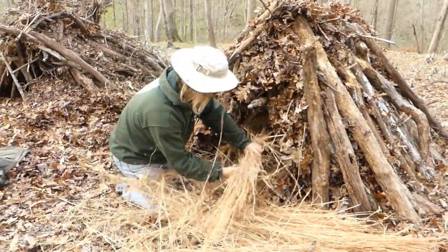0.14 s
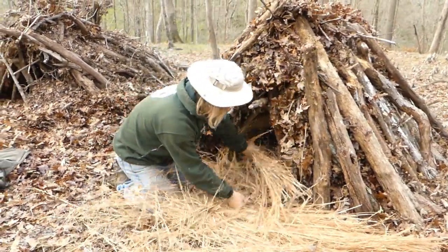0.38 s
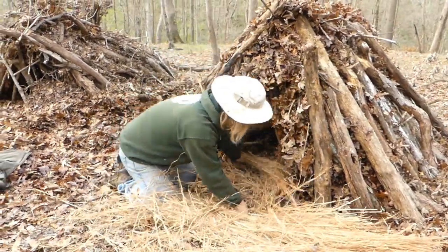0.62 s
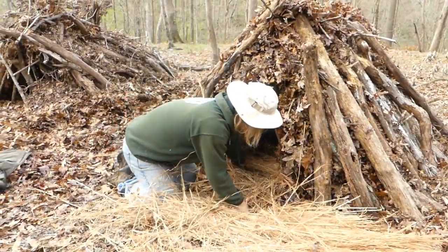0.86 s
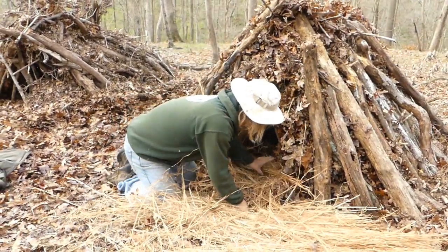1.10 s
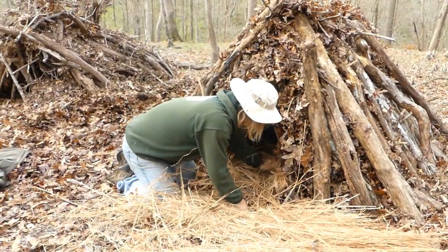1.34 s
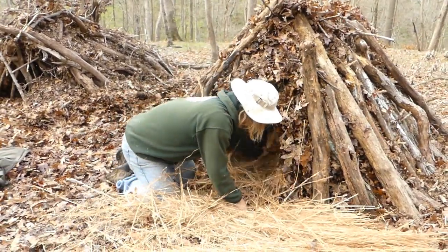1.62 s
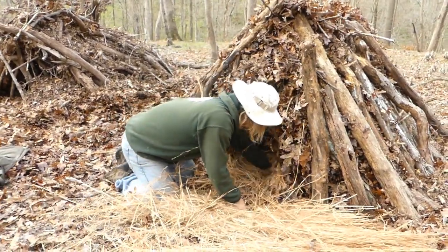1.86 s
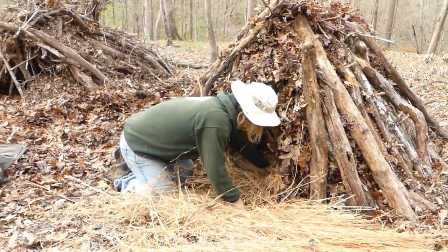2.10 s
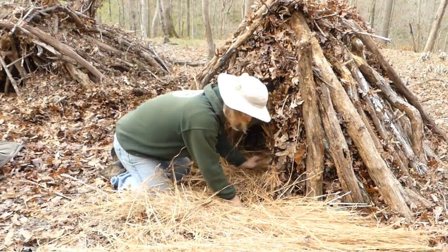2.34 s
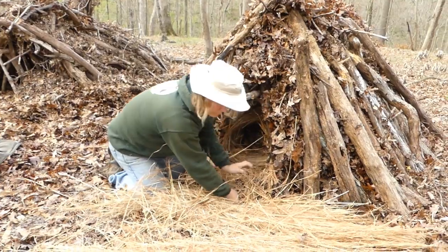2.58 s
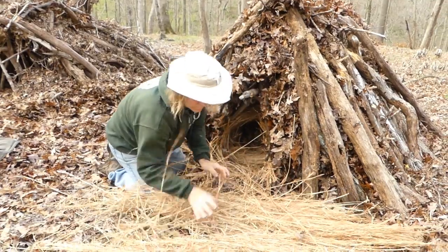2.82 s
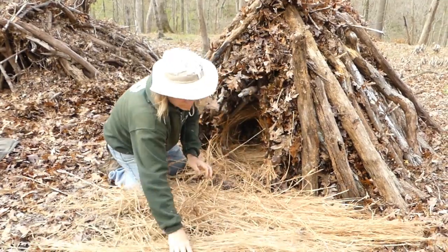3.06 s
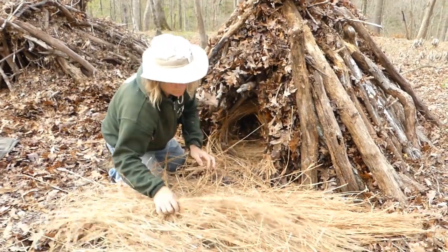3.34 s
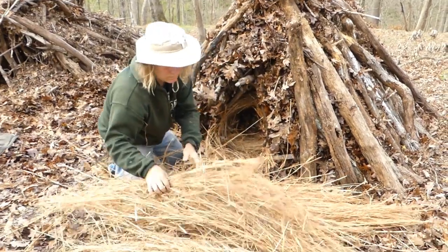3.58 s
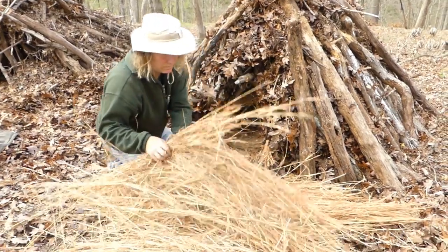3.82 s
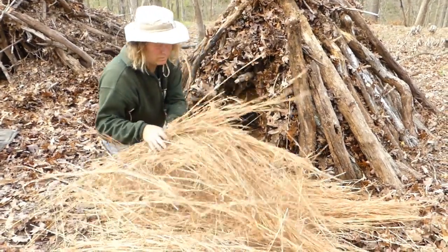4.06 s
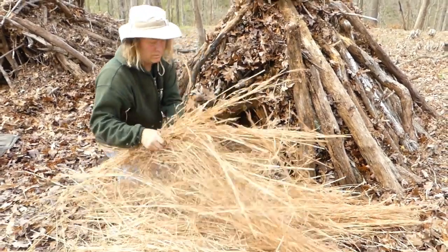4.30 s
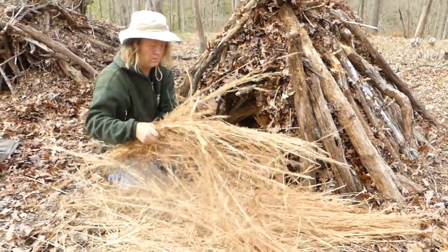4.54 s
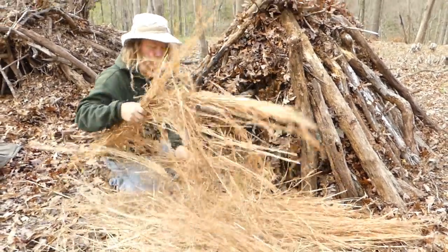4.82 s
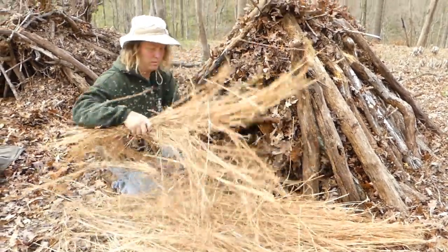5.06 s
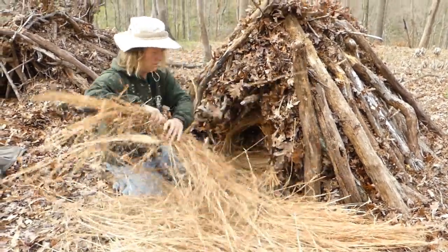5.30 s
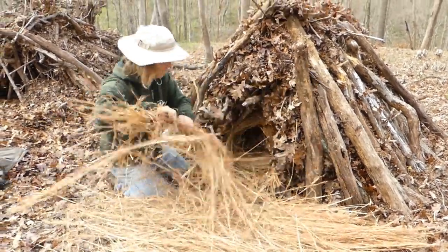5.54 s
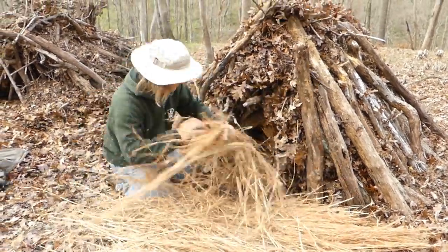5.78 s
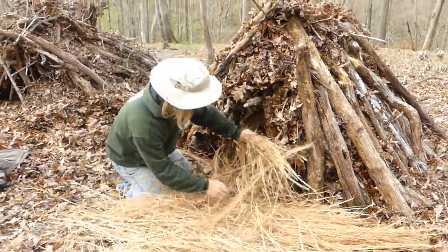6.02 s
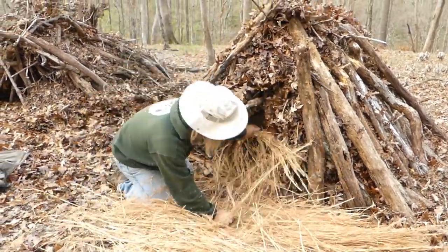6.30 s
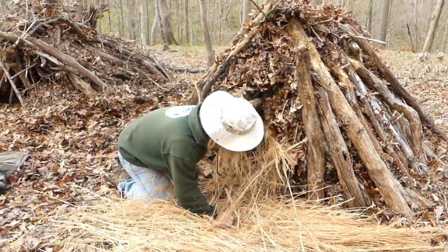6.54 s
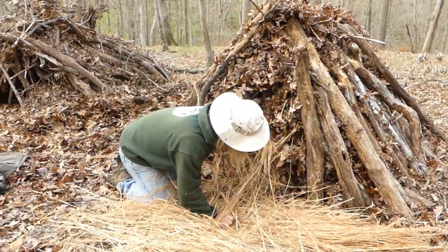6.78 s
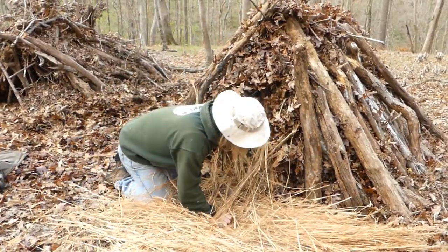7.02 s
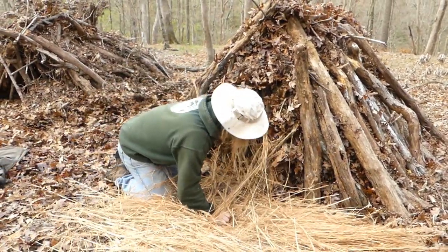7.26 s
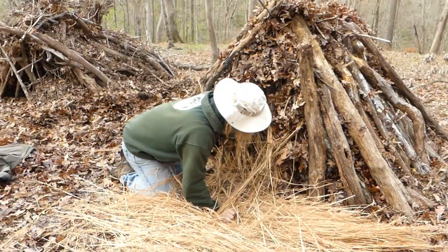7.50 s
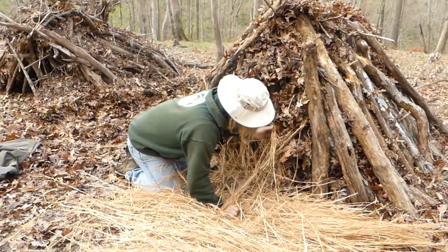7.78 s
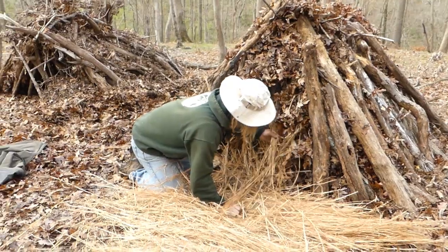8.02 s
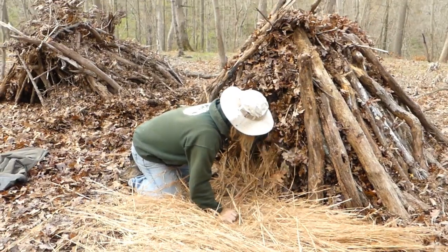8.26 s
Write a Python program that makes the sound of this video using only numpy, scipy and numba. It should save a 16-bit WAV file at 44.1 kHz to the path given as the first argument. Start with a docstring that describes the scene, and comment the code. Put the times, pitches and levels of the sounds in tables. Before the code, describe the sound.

Outdoors in a quiet wood, close to a small stereo microphone, dry grass stems rustle with a bright, scraping hiss full of tiny ticks. From 0 to 2 s the bundle is pushed in uneven surges, with thin sharp stalk snaps and soft dead-leaf crunch. Handling fades around 2.1-2.9 s, leaving small ticks, faint tree hush and low breeze puffs. At about 3.05 s a handful is grabbed abruptly; dense, fuller swishing runs to 5 s with few snaps. Another grab comes at 5.3 s, then strong brittle cracks around 5.7-6.1 s, the sharpest near 5.9. Stuffing continues with leafier crunch, another hard crack at 6.86 s, and a thinning rustle after 7 s. Around 7.6-7.85 s duller woody snaps cluster to the left over low crunching. A final rustle rises from 8 s, with a loud crack at 8.23 and fluttering wind thumps until the end at about 8.4 s.

```python
"""A wood: someone kneeling gathers a bundle of dry grass and pushes it into a shelter of poles and dead leaves.
Stems and leaves are dense damped grains over a scraping hiss, gated by the movements of hands and bundle.
Single stalks snap as noise bursts with a ring and a knock; squashed tufts crunch as low grains.
A light breeze buffets the small stereo microphone: low noise and short swings over the faint hush of the wood."""
import sys
import numpy as np
from scipy import signal
from scipy.fft import rfft, irfft, next_fast_len
from scipy.io import wavfile
from scipy.ndimage import uniform_filter1d
from numba import njit

SR = 44100
rng = np.random.default_rng(int(sys.argv[2]) if len(sys.argv) > 2 else 0)


def magnitude_from_level(level_db):
    """Linear magnitude for a level in decibels (20 dB per decade)."""
    exponent = np.asarray(level_db, float) / 20
    return 10 ** exponent


def generate_wav(signal):
    """Clip the signal to [-1, 1] and save it as 16-bit WAV at the path in sys.argv[1]."""
    frames = np.transpose(np.atleast_2d(signal))
    scaled = np.clip(frames, -1, 1) * 32767
    pcm = np.round(scaled).astype(np.int16)
    wavfile.write(sys.argv[1], SR, pcm)


N = 369543  # samples

# far hush of the trees, relative spectrum: f/Hz, level/dB per Hz
WOOD_SPECTRUM = [(100, -11), (250, 5.5), (400, 3.5), (520, 6), (700, 2), (1200, 0), (4000, -12.5),
                 (10000, -34), (16000, -47)]
# breeze on the microphone: t/s, level/dB
BREEZE_LEVEL = [(0.0, -42.5), (1.93, -48), (2.05, -42), (2.99, -48), (3.83, -38.5), (4.04, -43),
                (5.83, -44), (5.95, -40), (6.11, -46.5), (7.37, -39.5), (7.56, -48.5), (7.75, -31),
                (7.84, -43.5), (8.33, -26.5), (8.38, -40)]
# single buffets of air: t/s, peak/dB, f/Hz, left minus right/dB
AIR_BUFFETS = [(0.735, -37, 87, 1.5), (2.069, -25, 134, -4), (2.235, -35.5, 117, -0.5),
               (2.509, -35, 133, 3), (2.576, -32, 146, 2), (3.532, -34.5, 130, 2.0), (3.851, -27, 143, -5),
               (4.367, -33, 112, -6), (4.819, -29, 113, -3), (5.393, -32, 101, -2), (5.722, -33.5, 117, -4),
               (5.932, -28, 127, -5), (7.716, -27.5, 198, -2), (7.755, -23.5, 212, 9),
               (7.892, -32.5, 198, -1), (8.1, -23, 143, 2), (8.172, -19, 219, -3), (8.214, -21.5, 124, 6),
               (8.286, -32, 147, 6), (8.304, -15.5, 156, -3), (8.328, -21, 237, -6)]
# rumble of the breeze, relative spectrum: f/Hz, level/dB per Hz
RUMBLE_SPECTRUM = [(25, -13), (60, -4), (110, 3.5), (180, -3), (300, -12.5), (500, -21.5)]
# small quick eddies, relative spectrum: f/Hz, level/dB per Hz
FLUTTER_SPECTRUM = [(150, -31), (280, 10.5), (450, 3), (750, -27)]
# pulls, pushes and shakes: start t/s, held/s, grass level/dB, leaf crunch level/dB
MOVEMENTS = [(0.0, .3, -34.5, -42.5), (0.3, 0.12, -32.5, -43), (0.46, 0.095, -32, -40),
             (0.6, 0.062, -29, -37.5), (0.76, 0.051, -32.5, -40), (0.9, 0.14, -36, -46),
             (1.303, 0.0075, -35, -40), (1.45, 0.034, -34, -42), (1.59, 0.044, -30.5, -44),
             (1.69, 0.038, -47, -54), (1.81, 0.015, -33, -42), (1.91, 0.01, -35.5, -39),
             (2.0, 0.018, -41.5, -49), (2.07, .02, -42, -63), (2.25, 0.0096, -43.5, -48),
             (2.39, 0.005, -51, -55), (2.47, 0.013, -49, -43.5), (2.56, 0.018, -57, -46),
             (2.66, 0.026, -37, -43), (2.8, 0.034, -48, -61), (2.89, 0.0092, -39, -51),
             (3.3, 0.12, -28, -37.5), (3.53, 0.077, -28, -39), (3.72, 0.022, -26, -40),
             (3.89, 0.044, -28, -40.5), (4.05, 0.066, -28.5, -44.5), (4.229, 0.062, -27.5, -40.5),
             (4.42, 0.1, -32, -45), (4.6, 0.17, -28.5, -41), (4.9, 0.28, -33.5, -50.5),
             (5.15, 0.08, -34, -60), (5.43, 0.3, -32.5, -47), (5.72, 0.11, -31, -45),
             (5.92, 0.13, -31, -43), (6.1, 0.16, -30.5, -39.5), (6.28, 0.12, -27, -36),
             (6.52, 0.089, -31.5, -39.5), (6.68, 0.048, -28.5, -36), (6.8, 0.082, -39, -39),
             (7.1, 0.069, -39.5, -43.5), (7.26, 0.041, -36.5, -37), (7.39, 0.0057, -45, -41),
             (7.52, 0.012, -53, -39.5), (7.68, 0.045, -59, -41), (7.82, 0.027, -42, -34.5),
             (7.76, .03, -57, -47), (7.93, .02, -40.5, -46), (8.02, 0.045, -31.5, -34.5),
             (8.15, 0.075, -31.5, -36), (8.38, .01, -34.5, -36)]
# sudden grabs of a handful: start t/s, held/s, grass level/dB, leaf crunch level/dB
HANDFUL_GRABS = [(3.051, .2, -29.5, -40), (5.295, 0.062, -26, -38.5), (7.605, 0.027, -50, -37)]
# stems as the microphone colours them, relative spectrum: f/Hz, level/dB per Hz
GRASS_SPECTRUM = [(880, -19.5), (1500, -12.5), (2970, -7.5), (4060, -7), (4940, -3.5), (7750, -5.5),
                  (9890, -0.5), (12900, -0.5), (15500, -6)]
# dead leaves, relative spectrum: f/Hz, level/dB per Hz
LEAF_SPECTRUM = [(250, -44), (500, -2.5), (900, -1), (1800, -0.5), (3500, -2.5), (7000, -8)]
# stereo width of the heap: f/Hz, side against mid/dB
HEAP_WIDTH = [(300, 16), (700, -8.5), (1500, -10), (4000, -14), (7000, -12), (9000, -7.5), (15000, -8.5)]
# stalks snapping: t/s, crack level/dB, woody knock level/dB, left minus right/dB, stalk pitch f/Hz
STALK_SNAPS = [(0.16, -3, -27.5, 2, 9100), (0.4033, -12, -27, 2, 11120), (0.466, -16, -40, -3, 3500),
               (0.5268, -15, -42, -1, 5500), (0.607, -11, -22.5, 1.0, 12700), (0.629, -18, -38, 0.0, 6000),
               (0.9096, -12.5, -51, 1.0, 12000), (1.32, -23, -41, 2, 2000),
               (1.5479, -14.5, -50, -0.5, 3370), (1.5516, -18, -34, -1, 11300),
               (1.6034, -19, -22, -3, 1790), (1.6167, -10.5, -25, 0, 10300),
               (1.698, -15.5, -50, 1.0, 12400), (1.7644, -28, -44, 0.0, 3000),
               (1.8123, -14.5, -35, -1, 6900), (1.8861, -18, -50, 0.0, 8000),
               (2.0657, -15.5, -47, 1.5, 10100), (2.2189, -10, -36, -1, 13200),
               (2.312, -30, -55, 0.0, 10000), (2.325, -42, -37, -2, 3910), (2.383, -25, -30.5, -2, 3750),
               (2.4553, -30, -40, 0.0, 2390), (2.596, -24, -50, 0.5, 12300), (4.5427, -15, -47, 12, 13300),
               (5.1608, -8.5, -32.5, 5, 5050), (5.2427, -10, -35, 2, 12800), (5.342, -11, -45, 0.0, 8500),
               (5.698, -5.5, -52.5, 3, 12000), (5.8453, -8.5, -44, 3, 9640), (5.8924, -24, -31, 1.5, 9370),
               (5.9182, 1.5, -26, 2, 10600), (6.0093, -8, -43, -1, 5260), (6.0866, -17, -44, -4, 4730),
               (6.1115, -11, -34, 0.5, 12000), (6.363, -22, -25, 0.5, 11600),
               (6.3964, -27, -16.5, -1, 2320), (6.454, -9, -40, -1, 6660), (6.4664, -8.5, -25.5, 0.5, 9770),
               (6.7974, -20, -38, -1.0, 4000), (6.8593, 0.5, -24, 1.5, 9900), (6.907, -16, -33, 4, 9620),
               (6.9237, -12, -41, 1, 6500), (7.0333, -15, -37, 1.0, 12100),
               (7.0696, -18.5, -26.5, 0.0, 2600), (7.216, -24, -53, 0.0, 5320),
               (7.2684, -24, -45, 1.0, 3560), (7.587, -16.5, -17.5, 6, 3500), (7.6531, -21, -35, 10, 3090),
               (7.683, -16, -31, 6, 3800), (7.7197, -14, -22, 8, 3250), (7.7594, -26, -39, 2.5, 3440),
               (7.7986, -26, -31, 8, 2890), (7.8394, -20, -33, 11, 3640), (7.9028, -25, -29, 3, 9860),
               (8.0686, -18, -36, 0.0, 2500), (8.2327, 2.5, -26, 0.5, 10500), (8.2696, -11, -30, -3, 5500),
               (8.31, -13, -46, 0, 6500)]
# woody knock, relative spectrum: f/Hz, level/dB per Hz
KNOCK_SPECTRUM = [(300, -34), (600, 6), (1000, -0.5), (1800, 4.5), (3000, -10), (6000, -24)]
# bundle squashed against the ground: start t/s, held/s, level/dB
GROUND_PRESSES = [(7.37, .04, -43), (7.69, .17, -38.5), (8.02, .12, -43.5)]
# microphone response: f/Hz, gain/dB
MIC_RESPONSE = [(20, -20), (45, -5), (80, 0), (15800, 0), (16000, -25), (16900, -55)]

WOOD_DB = -50.5
RISE_DB_S, GRAB_RISE_DB_S, SETTLE_DB_S = 85, 450, 72  # slopes near the top of a movement
ROUND_DB_S2 = 598  # flanks steepen away from the top
STRAIN_DB_S, SHAKE_DB_S = 1200, 171  # rustle swells towards a snap, falls after it
SHAKE_GRASS_DB, SHAKE_LEAF_DB = -28, -13.5  # shaken neighbours against crack, knock
STRAY_DB = -8  # lone ticks against the rustle
GRAIN_MOST = 3.2  # strongest grain, in spreads
THIN_HZ, THICK_DB_OCT = 11100, 4  # lower-pitched, thicker stalks crack duller and stir the grass less
STALK_Q, RING_DB, BROAD_DB = 2.2, -6, -2  # resonance; ring and broadband parts of the crack
PRESS_PAN_DB = 3


def unit_rms(x):
    """Scale to rms 1."""
    return x / np.sqrt(np.mean(x ** 2))


def colour(x, points):
    """Shape the spectrum by (f/Hz, gain/dB) points on a log frequency axis."""
    hz, db = np.transpose(points)
    size = next_fast_len(N)
    log_hz = np.log(np.arange(size // 2 + 1) * SR / size + 1)
    gain = magnitude_from_level(np.interp(log_hz, np.log(hz), db))
    return irfft(rfft(x, size) * gain, size)[..., :N]


def colour_same_rms(x, points):
    """Colour that keeps the rms of white noise."""
    hz, db = np.transpose(points)
    gain = magnitude_from_level(np.interp(np.log(np.arange(1, SR / 2)), np.log(hz), db))
    return colour(x, points) / np.sqrt(np.mean(gain ** 2))


def walk(rate_hz):
    """Random levels held 1 / rate_hz and slewed twice; rms 1."""
    k = int(SR / rate_hz)
    held = np.repeat(rng.standard_normal(N // k + 1), k)
    slewed = uniform_filter1d(uniform_filter1d(held, k), k)
    return unit_rms(slewed[:N])


def pair(mid, side):
    """Left and right from mid and side."""
    return np.array([mid + side, mid - side])


def panned(x, pan_db):
    """Left and right, pan_db apart in level."""
    return x * magnitude_from_level(np.array([[pan_db], [-pan_db]]) / 2)


def wood():
    """Far hush of the trees: coloured noise, hardly alike in the two ports."""
    mid, side = unit_rms(colour(rng.standard_normal((2, N)), WOOD_SPECTRUM))
    return pair(mid, magnitude_from_level(1.5) * side) * magnitude_from_level(WOOD_DB + 1.4 * walk(3.09))


def rumble():
    """Eddies rolling over a port: low noise in random surges."""
    surge = magnitude_from_level(np.minimum(4.7 * walk(30), 6.0))
    return unit_rms(colour(rng.standard_normal(N) * surge, RUMBLE_SPECTRUM))


def flutter():
    """Smaller eddies shed separately at each port."""
    surge = magnitude_from_level(2.1 * walk(40))
    return unit_rms(colour(rng.standard_normal((2, N)) * surge, FLUTTER_SPECTRUM))


def breeze():
    """Rumble partly alike in both ports, flutter that grows quicker, and thumps as short low swings."""
    s, db = np.transpose(BREEZE_LEVEL)
    gust_db = np.interp(np.arange(N) / SR, s, db)
    mid, side = rumble(), rumble()
    out = pair(mid, magnitude_from_level(-5.0) * side) * magnitude_from_level(gust_db)
    out += flutter() * magnitude_from_level(1.38 * gust_db + 4.5)
    for s, db, hz, pan_db in AIR_BUFFETS:
        i = int(s * SR)
        t = np.arange(N - i)[:4096] / SR
        swell = t * hz / 0.49 * np.exp(1 - t * hz / 0.65)
        thump = np.sin(2 * np.pi * hz * t) * swell
        out[:, i:i + len(t)] += panned(thump * magnitude_from_level(db), pan_db)
    return out


def dull_db(hz):
    """Treble lost by a thick, low-pitched stalk."""
    return THICK_DB_OCT * np.maximum(np.log2(THIN_HZ / hz), 0)


def swell_db(t, start, held, rise_db_s):
    """A movement swells, holds and settles."""
    before = np.maximum(start - t, 0)
    after = np.maximum(t - start - held, 0)
    return -rise_db_s * before - SETTLE_DB_S * after - ROUND_DB_S2 * (before + after) ** 2


def handling():
    """Gains of grass and leaves: movements swell and settle, snaps shake the heap; powers add."""
    t = np.arange(0, N, 32) / SR
    start, held, *move_db = np.transpose(MOVEMENTS + HANDFUL_GRABS)[:, :, None]
    rise = np.array([RISE_DB_S] * len(MOVEMENTS) + [GRAB_RISE_DB_S] * len(HANDFUL_GRABS))[:, None]
    shape_db = swell_db(t, start, held, rise)
    s, crack_db, knock_db, _, hz = np.transpose(STALK_SNAPS)[:, :, None]
    slope_db_s = np.where(t < s, STRAIN_DB_S, SHAKE_DB_S)
    shake = magnitude_from_level(-slope_db_s * np.abs(t - s) - ROUND_DB_S2 * (t - s) ** 2)
    shake_db = crack_db + SHAKE_GRASS_DB - dull_db(hz), knock_db + SHAKE_LEAF_DB
    gains = []
    for m, k in zip(move_db, shake_db):
        power = np.sum(magnitude_from_level(m + shape_db) ** 2, axis=0) + np.sum((magnitude_from_level(k) * shake) ** 2, axis=0)
        gains.append(np.interp(np.arange(N) / SR, t, np.sqrt(power)))
    return gains


@njit
def ring(n, start, turn, fade, size):
    """Each grain is a damped swing: turn radians a sample, fading by a factor a sample."""
    out = np.zeros(n)
    for g in range(len(start)):
        z, p = size[g] + 0j, fade[g] * np.exp(1j * turn[g])
        i = start[g]
        while i < n and abs(z) > abs(size[g]) / 100:
            out[i] += z.real
            z *= p
            i += 1
    return out


def grains(count, low_hz, high_hz, cycles, spread_db):
    """Tiny contacts at random moments, each fading over some cycles; a few are much stronger than the rest."""
    when, pitch, strength, sign = rng.random((count, 4)).T
    hz = np.minimum(low_hz + (high_hz - low_hz) * pitch, 19000)
    spreads = np.minimum(-np.log(1 - strength), GRAIN_MOST)
    size = magnitude_from_level(spread_db * spreads) * np.sign(sign - .5)
    start = (when * N).astype(np.int64)
    return unit_rms(ring(N, start, 2 * np.pi * hz / SR, np.exp(-hz / SR / cycles), size))


def crackle(count, spread_db, tail_s, most_db):
    """Envelope of small breaks: sudden start, short tail, each kick at most most_db; rms 1."""
    when, strength = rng.random((count, 2)).T
    kicks = np.zeros(N)
    kicks[(when * N).astype(int)] = magnitude_from_level(np.minimum(-spread_db * np.log(1 - strength), most_db))
    return unit_rms(signal.lfilter([1], [1, -np.exp(-1 / (tail_s * SR))], kicks))


def rustle(points, ticks, hiss_db, breaks, breaks_db, surge):
    """Ticks over a scraping hiss that small breaks push up; the spread of the heap gives a separate side sound."""
    push = surge * (1 + magnitude_from_level(breaks_db) * breaks)

    def layer():
        scrape = unit_rms(ticks() + magnitude_from_level(hiss_db) * rng.standard_normal(N))
        return unit_rms(colour(scrape * push, points))

    mid, side = layer(), layer()
    return pair(mid, colour(side, HEAP_WIDTH))


def grass():
    """Thin stems sliding and ticking against each other."""
    def ticks():
        return grains(count=60000, low_hz=1370, high_hz=16700, cycles=0.79, spread_db=0.5)

    breaks = crackle(count=500, spread_db=7.0, tail_s=0.0042, most_db=19.0)
    return rustle(GRASS_SPECTRUM, ticks, hiss_db=1.0, breaks=breaks, breaks_db=-21.0,
                  surge=magnitude_from_level(0.27 * walk(30)))


def strays():
    """Lone stalks ticking inside the bundle, each at its own pitch."""
    ticks = grains(count=2200, low_hz=2200, high_hz=12000, cycles=1.8, spread_db=3.2)
    return magnitude_from_level(STRAY_DB) * unit_rms(colour(ticks, GRASS_SPECTRUM))


def leaves():
    """Dead leaves crushed under hand, knee and bundle: coarser, lower grains."""
    def crush():
        return grains(count=14000, low_hz=400, high_hz=5000, cycles=1.1, spread_db=2.1)

    breaks = crackle(count=300, spread_db=8.5, tail_s=0.005, most_db=11.5)
    return rustle(LEAF_SPECTRUM, crush, hiss_db=10.0, breaks=breaks, breaks_db=-9.5,
                  surge=magnitude_from_level(1.0 * walk(20)))


def snaps():
    """A stalk breaks: a sharp crack rings at its pitch, fibres tear for a few ms; thick ones knock lower too."""
    crack, rung, body = np.zeros((3, 2, N))
    t = np.arange(4096) / SR
    noises = rng.standard_normal((len(STALK_SNAPS), len(t)))
    for (s, db, body_db, pan_db, hz), fibres in zip(STALK_SNAPS, noises):
        i = int(s * SR)
        span = slice(i, i + len(t))
        split = 0.35 * np.sign(fibres) * np.exp(-t / 0.00017) + 0.24 * fibres * np.exp(-t / 0.0036)
        broad = magnitude_from_level(db + BROAD_DB - dull_db(hz)) * split
        crack[:, span] += panned(broad, pan_db)[:, :N - i]
        peak = signal.iirpeak(hz, STALK_Q, fs=SR)
        tone = signal.lfilter(*peak, signal.lfilter(*peak, split))
        tone = magnitude_from_level(db + RING_DB) * tone / np.abs(tone).max()
        rung[:, span] += panned(tone, pan_db)[:, :N - i]
        # the knock builds over a moment, as the thick part gives way
        knock = 1.34 * fibres * np.exp(-t / 0.0027) * (1 - np.exp(-t / 0.0014))
        body[:, span] += panned(magnitude_from_level(body_db) * knock, pan_db)[:, :N - i]
    return colour_same_rms(crack, GRASS_SPECTRUM) + rung + colour_same_rms(body, KNOCK_SPECTRUM)


def squash():
    """Thick tufts creak and crunch low while weight rests on them."""
    crunch = grains(count=5000, low_hz=600, high_hz=1300, cycles=2.4, spread_db=3.5)
    crunch = unit_rms(crunch * magnitude_from_level(1.5 * walk(60)))
    start, held, db = np.transpose(GROUND_PRESSES)[:, :, None]
    press_db = db + swell_db(np.arange(N) / SR, start, held, RISE_DB_S)
    gain = np.sqrt(np.sum(magnitude_from_level(press_db) ** 2, axis=0))
    return panned(crunch * gain, PRESS_PAN_DB)


def scene():
    """All sources at the microphone."""
    grass_gain, leaf_gain = handling()
    heap = (grass() + strays()) * grass_gain + leaves() * leaf_gain
    return wood() + breeze() + heap + snaps() + squash()


def top_cut(x):
    """Nothing passes above the cut-off."""
    return signal.sosfilt(signal.butter(12, 16850, fs=SR, output="sos"), x)


def record(dry):
    """The left port is a little louder; bass and top are cut; peaks clip at full scale."""
    heard = colour(panned(dry, 0.47), MIC_RESPONSE)
    mix = np.clip(heard, -1, 1)
    return top_cut(mix)


dry = scene()
out = record(dry)
generate_wav(out)
```